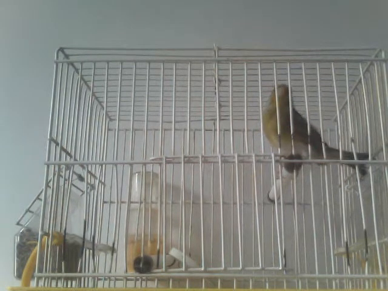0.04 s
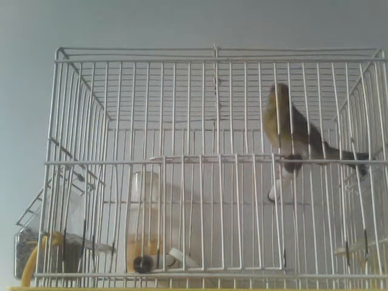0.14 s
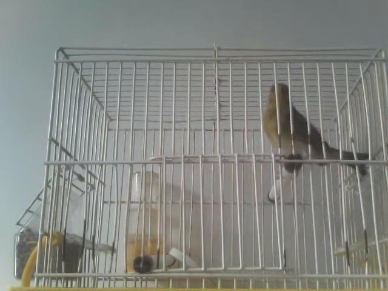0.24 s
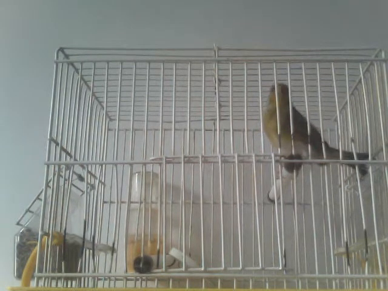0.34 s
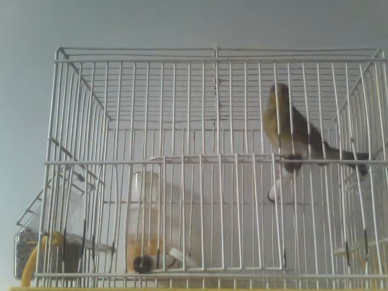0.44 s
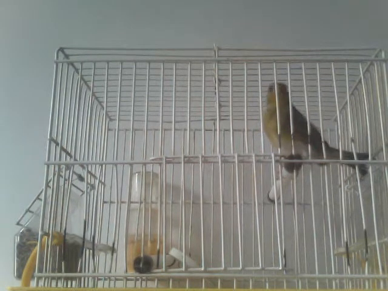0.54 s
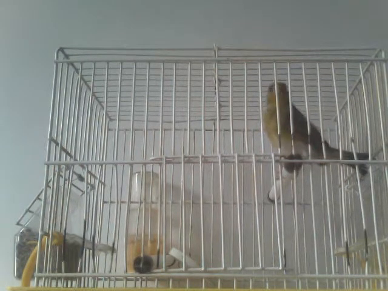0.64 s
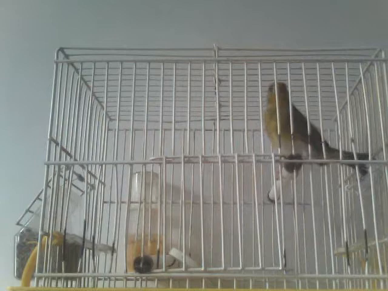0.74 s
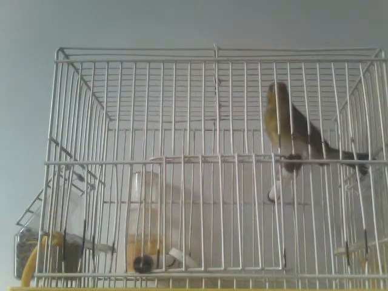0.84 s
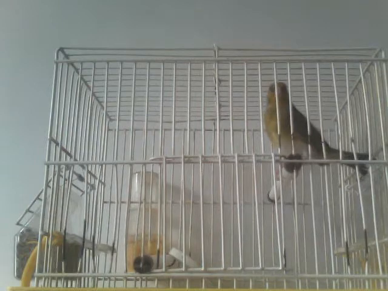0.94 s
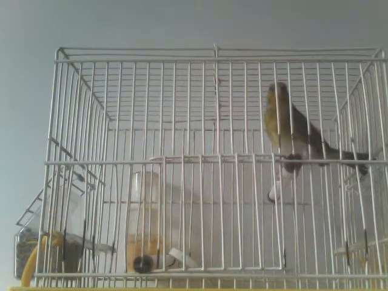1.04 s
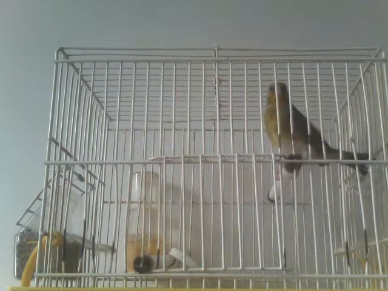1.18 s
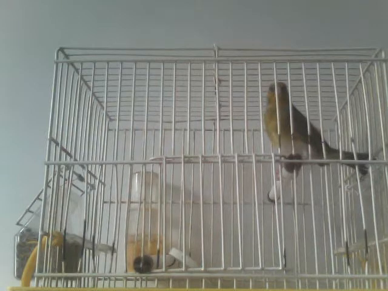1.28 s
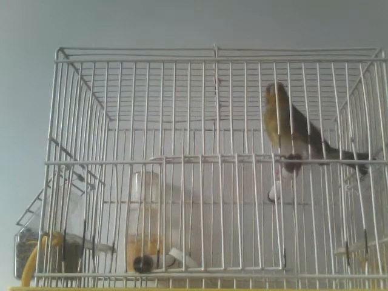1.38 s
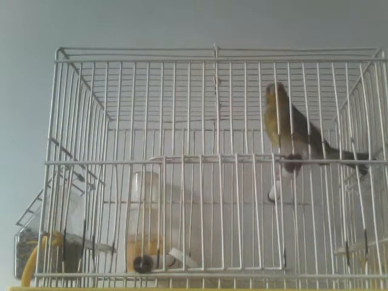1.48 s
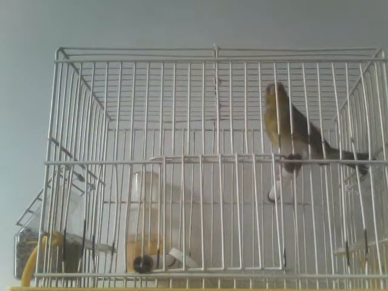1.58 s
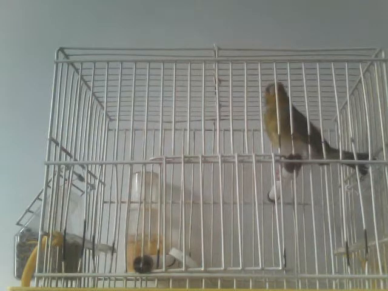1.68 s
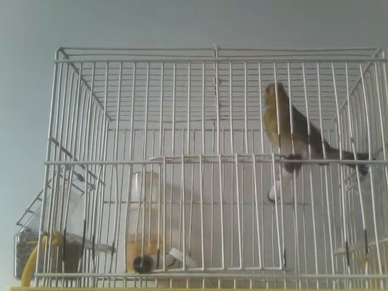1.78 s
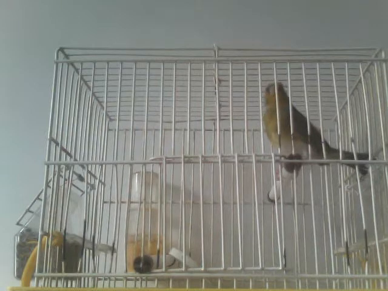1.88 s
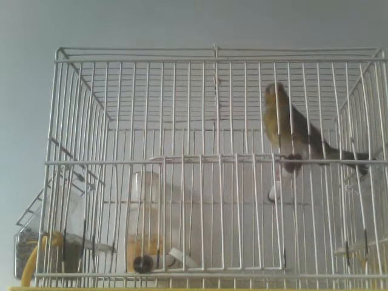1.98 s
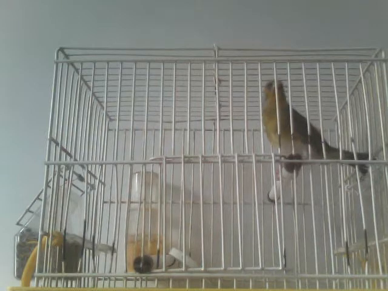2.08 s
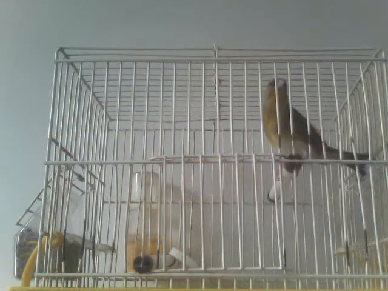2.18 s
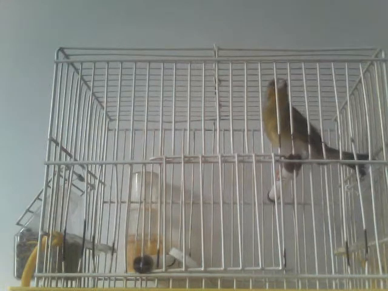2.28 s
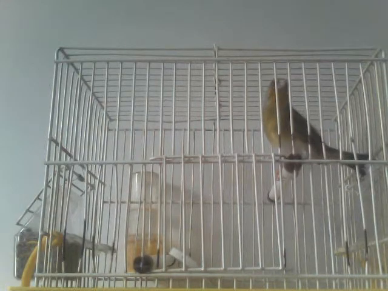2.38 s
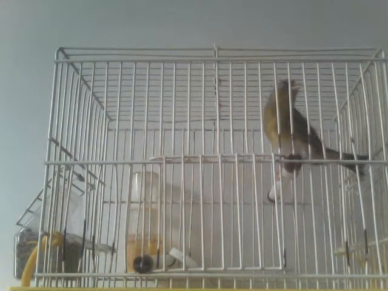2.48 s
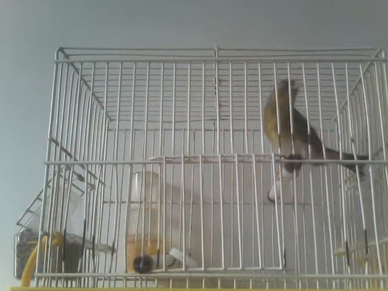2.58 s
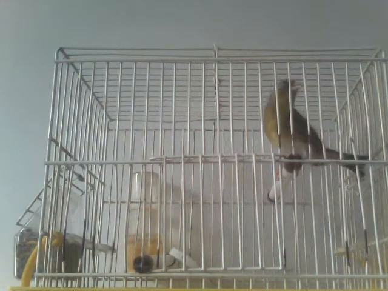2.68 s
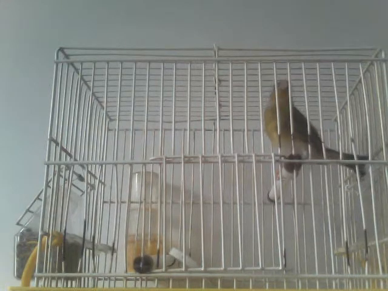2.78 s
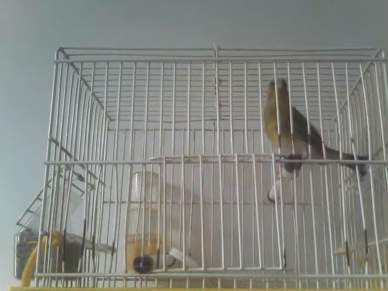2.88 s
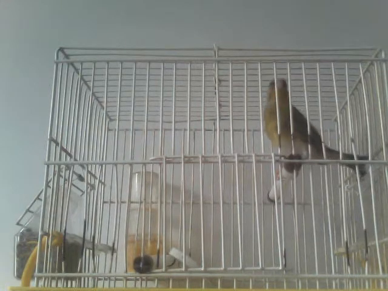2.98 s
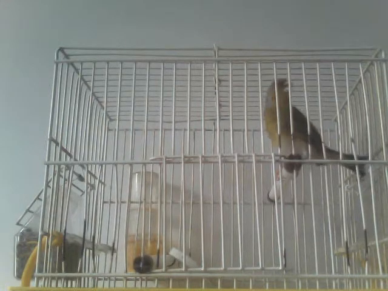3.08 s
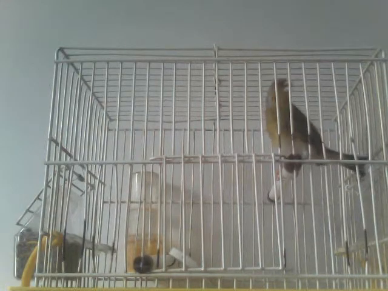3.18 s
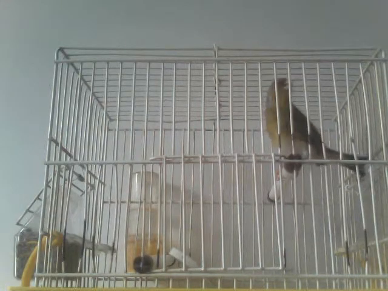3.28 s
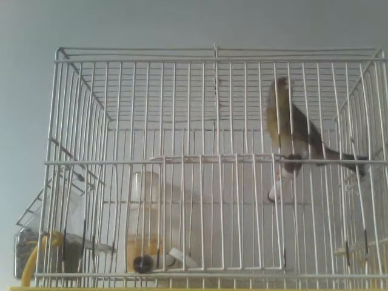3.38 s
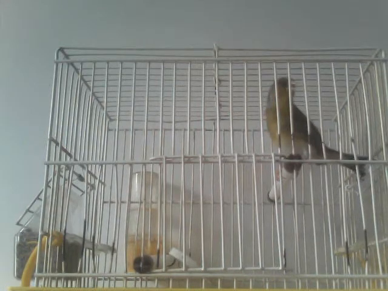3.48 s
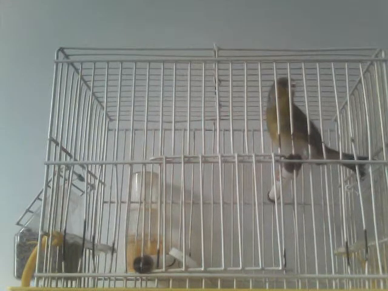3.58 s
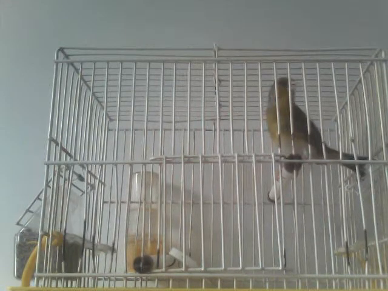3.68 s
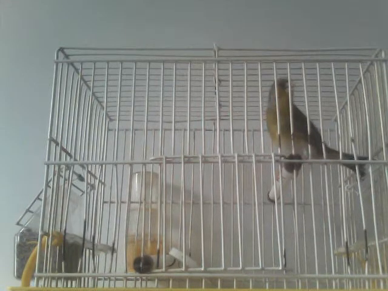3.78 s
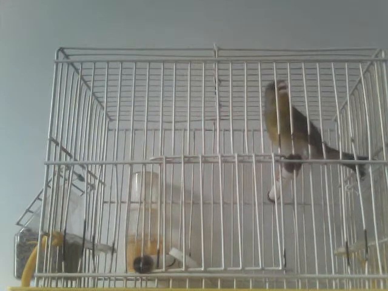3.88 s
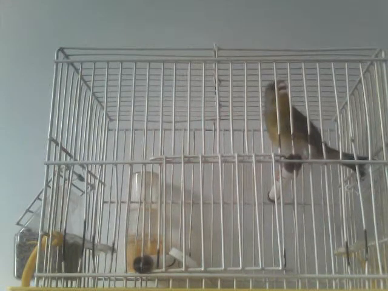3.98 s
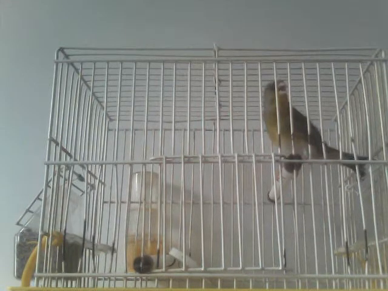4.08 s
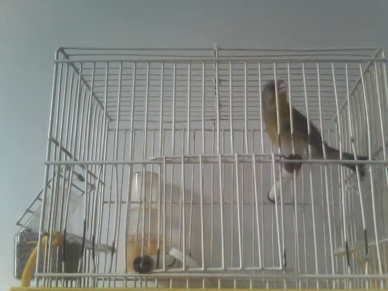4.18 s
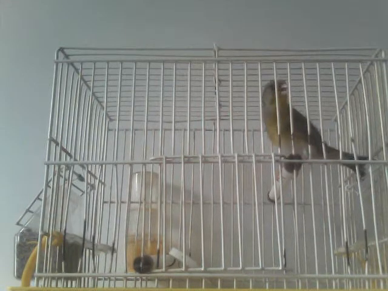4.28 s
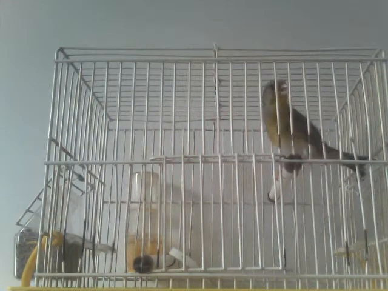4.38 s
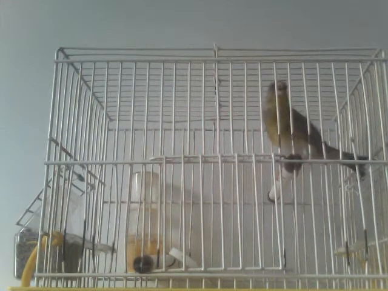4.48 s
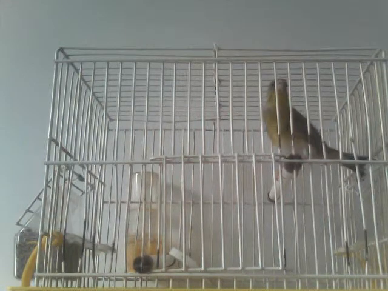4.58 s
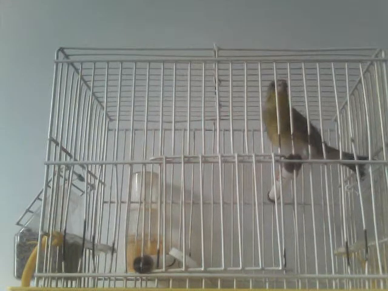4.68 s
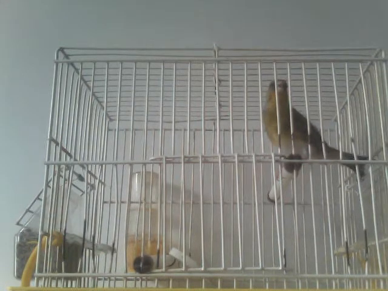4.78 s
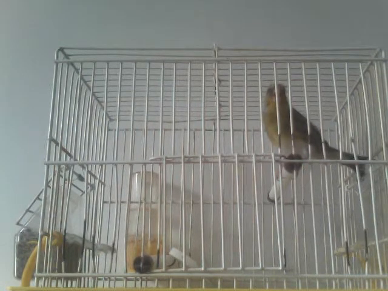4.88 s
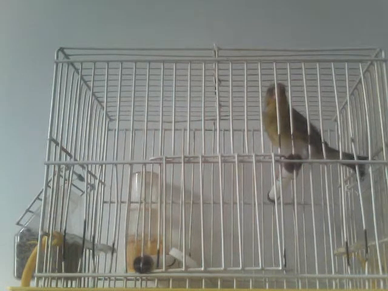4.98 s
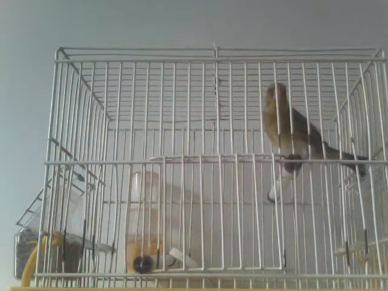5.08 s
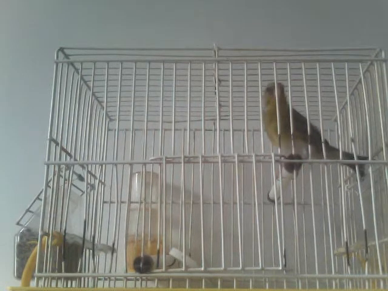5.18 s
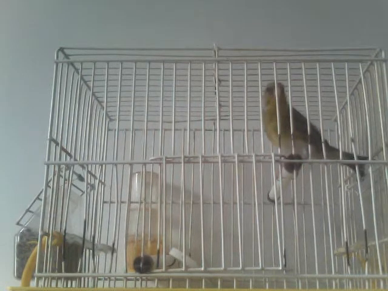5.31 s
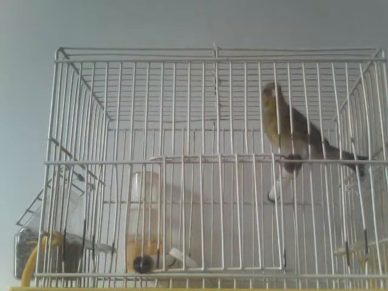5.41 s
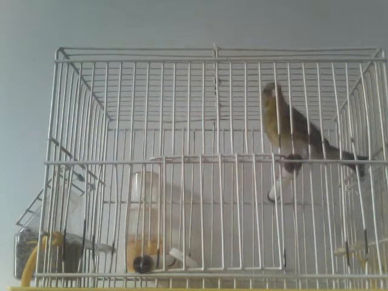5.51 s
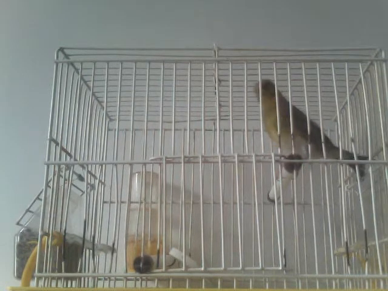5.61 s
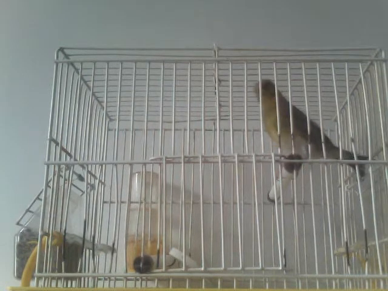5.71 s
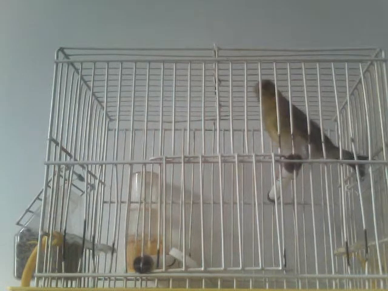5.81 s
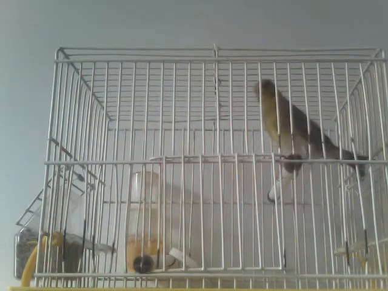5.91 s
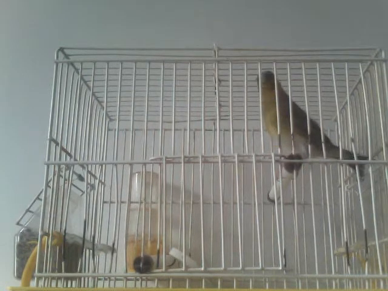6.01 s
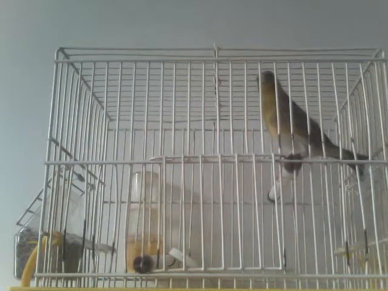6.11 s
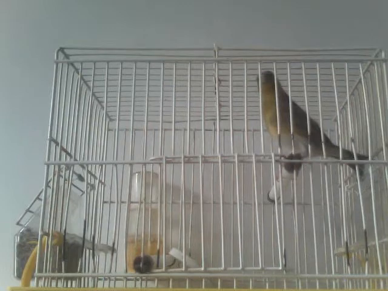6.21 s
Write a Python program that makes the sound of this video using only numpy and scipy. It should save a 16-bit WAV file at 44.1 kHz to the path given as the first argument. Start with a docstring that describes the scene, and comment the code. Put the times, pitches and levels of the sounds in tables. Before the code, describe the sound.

Close to a small microphone in a hard-walled room, a canary in a cage sings a single bright, piercing phrase. It follows a quiet stretch of mains hum and rumble, starting with four upward flicks that grow louder, then repeating a whistle, a buzz and a lower sliding note five times. The loudest notes distort a little. The song stops, leaving faint far-off chirps, thin drawn-out calls and the steady hum.

```python
"""A caged canary sings loud and close in a hard-walled room, overloading a small camera's microphone.
Its syrinx makes nearly pure, gliding tones: four rising chirps, then five rounds of whistle,
fluttering buzz and low slur, each ringing off the walls. Faint chirps and arching calls come from
far off, over a distant motor gathering speed, room rumble, mains hum and the camera's thin whine."""
import sys
import numpy as np
from scipy import signal
from scipy.fft import rfft, irfft
from scipy.io import wavfile
from scipy.ndimage import uniform_filter1d

SR = 44100
rng = np.random.default_rng(int(sys.argv[2]) if len(sys.argv) > 2 else 0)


def to_wav(s):
    """Save 16-bit WAV."""
    ch = np.atleast_2d(s).T  # columns
    pcm = np.round(np.clip(ch, -1, 1) * 32767)  # PCM
    wavfile.write(sys.argv[1], SR, pcm.astype(np.int16))


N = 275625
TIME = np.arange(N) / SR
# The shape of a tiny pip, near or far
PIP = dict(length_s=.016, glide_hz=40, settle_s=.01, onset=.55, swell_s=.008, release_s=.004)


def canary_upsweeps(pip_lead_s=.011, pip_hz=3470, pip_db=-28):
    """The song opens with four fast upward flicks of the syrinx, each led by a soft pip."""
    # Rising chirps: start_s, end_pitch_hz, level_db
    notes = [(2.259, 4690, -11.2), (2.500, 4770, -7.7), (2.727, 4770, -7.9), (2.937, 4780, -4.7)]
    # Their bright edge: harmonic, level_db
    overtones = [(2, -31), (3, -36), (4, -21.5)]
    pips = sing([(start - pip_lead_s, pip_hz, pip_db) for start, _, _ in notes], **PIP)
    return pips + sing(notes, overtones, length_s=.025, glide_hz=-1400, settle_s=.021,
                       onset=.42, swell_s=.016, release_s=.006)


def canary_whistles():
    """Held, almost pure notes: the first dips and climbs, the other four scoop up and sag."""
    # First whistle: start_s, end_pitch_hz, level_db
    lead_note = [(3.079, 4440, -3.2)]
    # Later whistles: start_s, end_pitch_hz, level_db
    notes = [(3.496, 4180, -4.9), (3.903, 4200, -4.7), (4.322, 4165, -5.1), (4.742, 4160, -4.4)]
    # Their faint sheen: harmonic, level_db
    overtones = [(2, -39), (3, -41.5), (4, -48.5)]
    lead = sing(lead_note, overtones, length_s=.155, glide_hz=170, settle_s=.02,
                drift_hz_per_s=1200, onset=.04, swell_s=.04, release_s=.016)
    return lead + sing(notes, overtones, waver_hz=16, length_s=.154, glide_hz=-160, settle_s=.008,
                       drift_hz_per_s=-180, onset=.38, swell_s=.014, release_s=.012)


def canary_buzzes():
    """The loudest, highest notes: a falling tone roughened by fast flutter."""
    # Buzzes: start_s, end_pitch_hz, level_db
    notes = [(3.272, 5350, -1.2), (3.673, 5320, -.5), (4.094, 5350, -.2), (4.506, 5320, .1),
             (4.926, 5320, -1.6)]
    # Their rasp: harmonic, level_db
    overtones = [(2, -25), (3, -23.5)]
    return sing(notes, overtones, buzzing=True, waver_hz=50, length_s=.083, glide_hz=430,
                settle_s=.024, onset=.08, swell_s=.04, release_s=.005)


def canary_slurs():
    """A low note slides upward to close each round."""
    # Slurs: start_s, end_pitch_hz, level_db
    notes = [(3.373, 3375, -3), (3.779, 3350, -2.8), (4.198, 3350, -3.8), (4.613, 3330, -3.8),
             (5.032, 3335, -4.7)]
    # Their colour: harmonic, level_db
    overtones = [(2, -41.5), (3, -30.5), (4, -46)]
    return sing(notes, overtones, waver_hz=36, length_s=.063, glide_hz=-240, settle_s=.04,
                onset=.12, swell_s=.04, release_s=.012)


def canary_soft_chirps():
    """A quiet, low chirp rises ahead of each upsweep."""
    # Soft chirps: start_s, end_pitch_hz, level_db
    notes = [(2.163, 2600, -34.5), (2.408, 2670, -32), (2.635, 2690, -29), (2.848, 2720, -27.5)]
    return sing(notes, overtones=[(2, -19.5)], length_s=.022, glide_hz=-800, settle_s=.016,
                onset=.3, swell_s=.016, release_s=.004)


def sing(notes, overtones=(), buzzing=False, waver_hz=11, **shape):
    """The syrinx plays one gesture a note: a wavering tone whose overtones grow with effort."""
    out = np.zeros(N)
    for start, pitch, db in notes:
        t, bend_hz, loud = gesture(**shape)
        hz = pitch + bend_hz + waver_hz * walk(250, len(t))
        if buzzing:
            hz, loud = flutter(t, hz, loud)
        phase = 2 * np.pi * np.cumsum(hz) / SR
        edge = sum(undb(level) * np.sin(round(k) * phase) for k, level in overtones)
        tone = np.sin(phase) + np.sqrt(np.abs(loud)) * edge
        add(out, start, undb(db) * loud * tone)
    return out


def gesture(length_s, glide_hz, settle_s, onset, swell_s, release_s, drift_hz_per_s=0, attack_s=.003):
    """The pitch glides in from glide_hz off; the airflow opens, swells from onset (0-1) and closes."""
    t = np.arange(int(length_s * SR)) / SR
    settling = np.exp(-t / settle_s)
    glide = glide_hz * (settling - settling[-1]) / (1 - settling[-1])
    drift = drift_hz_per_s * (t - length_s)
    swell = np.interp(t, [0, swell_s], [onset, 1])
    opening = np.clip(np.minimum(t / attack_s, (length_s - t) / release_s), 0, 1)
    return t, glide + drift, swell * np.sin(np.pi / 2 * opening) ** 2


def flutter(t, hz, loud, rate_hz=235.2, depth=.2, swing_hz=140, widen_hz_per_s=4000):
    """Loudness and pitch shake, the pitch ever wider, until the buzz breaks into a clearer tone."""
    break_at_s, break_takes_s, rough_db = .061, .006, -5
    rough = 1 - np.clip((t - break_at_s) / break_takes_s, 0, 1)
    swing = swing_hz + rough * widen_hz_per_s * t
    shake_hz = rate_hz * (1 + .03 * walk(60, len(t)))
    shake = np.sin(2 * np.pi * np.cumsum(shake_hz) / SR)
    return hz + swing * shake, loud * (1 + depth * shake) * undb(rough_db * rough)


def far_bird():
    """A distant bird answers with falling chirps and tiny pips."""
    # Falling chirps: start_s, end_pitch_hz, level_db
    chirp_notes = [(5.085, 4310, -47), (5.26, 4350, -54.5), (5.665, 4290, -50.5), (5.832, 4330, -47.5),
                   (6.172, 4370, -49)]
    # Pips: start_s, end_pitch_hz, level_db
    pip_notes = [(5.38, 3370, -45), (5.945, 3357, -52)]
    chirps = sing(chirp_notes, length_s=.065, glide_hz=290, settle_s=.04,
                  onset=.5, swell_s=.012, release_s=.02)
    return chirps + sing(pip_notes, **PIP)


def far_calls(waver_hz=10, arch_hz_per_s=75):
    """Drawn-out calls arch and sag through one throat resonance; longer calls arch higher."""
    # Distant calls: start_s, length_s, pitch_hz, fall_hz, level_db, throat_hz, throat_width_hz
    calls = [(0.08, 0.2, 995, 5, -60.5, 2900, 900), (1.47, 0.3, 938, 60, -65, 1900, 600),
             (5.486, 0.15, 974, 9, -51, 3330, 1370), (5.56, 0.22, 954, 4, -52, 2870, 700),
             (5.46, .8, 950, 72, -60.5, 1950, 500)]
    out = np.zeros(N)
    for start, length, pitch, fall, db, throat, width in calls:
        progress = np.linspace(0, 1, int(length * SR))
        arch = arch_hz_per_s * length * np.sin(np.pi * progress)
        hz = pitch + arch - fall * progress ** 2 + waver_hz * walk(63.4, len(progress))
        phase = 2 * np.pi * np.cumsum(hz) / SR
        tone = sum(np.sin(k * phase) / (1 + (2 * (k * pitch - throat) / width) ** 2) for k in range(2, 6))
        swell = np.sqrt(4 * progress * (1 - progress))
        add(out, start, undb(db) * swell * tone)
    return out


def room(x, direct, wet_db, treble_db=9, build_s=.0059):
    """Near echoes, then a diffuse tail; treble, beamed past the microphone, is wetter but dies sooner."""
    # Reflections off surfaces round the cage: delay_ms, gain
    echoes = [(1.9, 0.027), (4.6, 0.13), (9.5, 0.2)]
    whistle_t60_s, buzz_t60_s, treble_t60_s = .63, .5, .33
    t = np.arange(SR) / SR
    noise = rng.standard_normal(SR)
    low = signal.sosfiltfilt(signal.butter(6, 4700, fs=SR, output="sos"), noise)
    song_band = signal.sosfiltfilt(signal.butter(6, 7000, fs=SR, output="sos"), noise)
    decay = undb(-60 * t / whistle_t60_s)
    tail = low * decay
    tail += (song_band - low) * undb(-60 * t / buzz_t60_s)
    tail += (noise - song_band) * undb(treble_db - 60 * t / treble_t60_s)
    build = np.clip(t / build_s - .5, 0, 1)
    response = undb(wet_db) * tail * build / np.sqrt(np.sum(decay ** 2))
    response[0] += direct
    for ms, gain in echoes:
        response[int(ms * SR / 1000)] += direct * gain
    return signal.fftconvolve(x, response)[:N]


def far_motor(start_hz=385, end_hz=950, waver_hz=6, flicker_db=3):
    """A faint whine climbs as a motor gathers speed: at steady power, speed squared grows evenly."""
    level_db, rise_s, fade_db_per_s = -60, 1.6, 1.9
    hz = np.sqrt(np.linspace(start_hz ** 2, end_hz ** 2, N))
    phase = 2 * np.pi * np.cumsum(hz + waver_hz * walk(27, N)) / SR
    db = level_db - fade_db_per_s * TIME + flicker_db * walk(5, N)
    return np.minimum(TIME / rise_s, 1) * undb(db) * unit(np.sin(phase))


def room_tone(level_db=-49.5, swell_db=2.5, crest_s=3.63, half_width_s=2.2, flicker_db=1):
    """Low rumble under an even hiss; the mids flicker and rise in one broad swell."""
    # Tone colour of rumble and hiss: frequency_hz, relative_db
    spectrum = [(30, -78.5), (100, -80), (250, -82.5), (500, -81.5), (800, -85.5), (1300, -91.5),
                (2200, -96.5), (3500, -99.5), (5500, -101), (7000, -102.5), (11000, -104), (15500, -104.5)]
    hz, db = np.transpose(spectrum)
    colour = undb(np.interp(np.log(np.fft.rfftfreq(N, 1 / SR) + 1), np.log(hz), db))
    noise = undb(level_db) * unit(irfft(rfft(rng.standard_normal(N)) * colour, N))
    mids = signal.sosfiltfilt(signal.butter(2, [400, 1600], "band", fs=SR, output="sos"), noise)
    swell = swell_db * np.exp(-((TIME - crest_s) / half_width_s) ** 2)
    mid_gain = undb(swell - swell.mean() + flicker_db * walk(6, N))
    return noise + mids * (mid_gain - 1)


def electronics(mains_hz=50, mains_db=-32, frame_hz=30.05, tick_db=-68, tick_share=.1):
    """Mains hum with wavering upper tones, a thin whine, and a tiny high tick for each camera frame."""
    # Upper tones of the hum: pitch_hz, rms_db
    hum = [(149.5, -62), (343, -58)]
    # Steady whine of the camera: pitch_hz, rms_db
    whine = [(7582, -66.5), (7996, -73.5), (11373, -82.5), (13269, -75), (15165, -62)]
    out = undb(mains_db) * unit(np.sin(2 * np.pi * mains_hz * TIME))
    for hz, db in hum:
        tone = np.sin(2 * np.pi * hz * TIME + .79 * walk(3, N))
        out += undb(db) * unit(tone * undb(2 * walk(8.2, N)))
    for hz, db in whine:
        out += undb(db) * unit(np.sin(2 * np.pi * hz * TIME))
    bursts = rng.standard_normal(N) * (TIME * frame_hz % 1 < tick_share)
    ticks = signal.sosfilt(signal.butter(2, [14750, 15500], "band", fs=SR, output="sos"), bursts)
    return out + undb(tick_db) * unit(ticks)


def undb(db):
    """Decibels to gain."""
    return 10 ** (np.asarray(db) / 20)


def unit(x):
    """Scale to rms 1."""
    return x / np.sqrt(np.mean(x ** 2))


def add(track, start_s, sound):
    """Mix a sound into a track."""
    i = int(start_s * SR)
    track[i:i + len(sound)] += sound[:N - i]


def walk(rate_hz, size):
    """Smooth random drift with a spread near 1."""
    hold = max(int(SR / rate_hz), 2)
    steps = np.repeat(rng.standard_normal(size // hold + 1), hold)
    return uniform_filter1d(uniform_filter1d(steps, hold), hold)[:size]


def scene():
    """The canary up front, distant voices deep in the reverb and the background bed, in mono."""
    song = canary_upsweeps() + canary_whistles() + canary_buzzes() + canary_slurs()
    near = room(song, direct=.98, wet_db=-9.5)
    # The soft low chirps spread in all directions, so more of them comes back from the walls
    soft = room(canary_soft_chirps(), direct=.98, wet_db=-3)
    far = room(far_bird() + far_calls(), direct=1, wet_db=5.5)
    return (near + soft + far + far_motor() + room_tone() + electronics())[None]


def record(dry):
    """The loudest peaks overload the microphone and clip; a steep low-pass cuts the top."""
    top_cut = signal.ellip(10, .1, 70, 15750, fs=SR, output="sos")
    return signal.sosfilt(top_cut, np.clip(dry, -1, 1))


dry = scene()
out = record(dry)
to_wav(out)
```